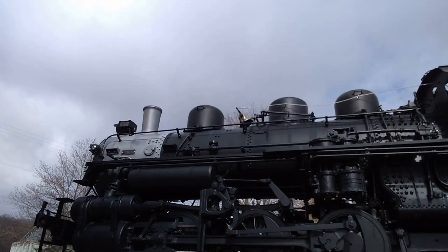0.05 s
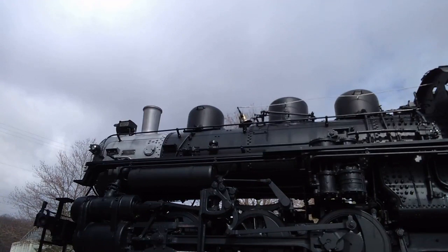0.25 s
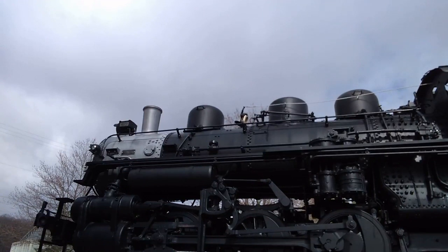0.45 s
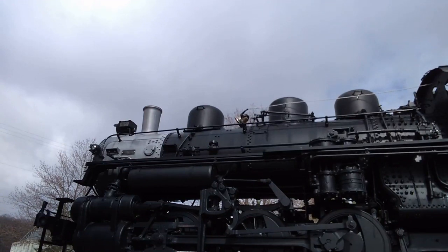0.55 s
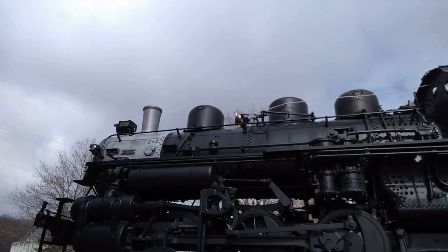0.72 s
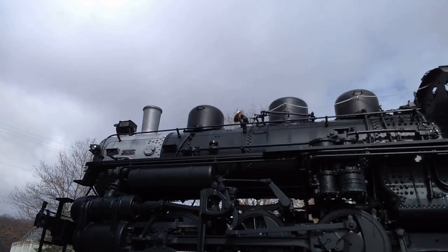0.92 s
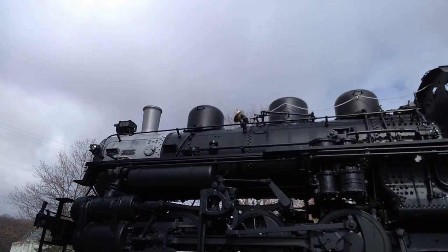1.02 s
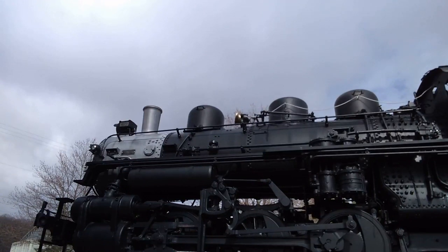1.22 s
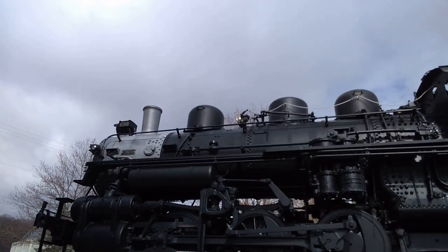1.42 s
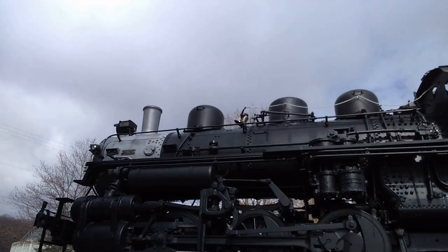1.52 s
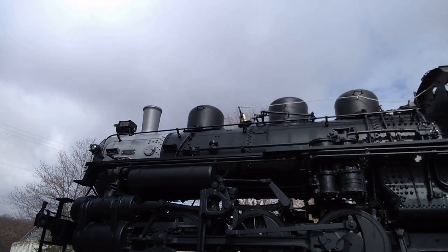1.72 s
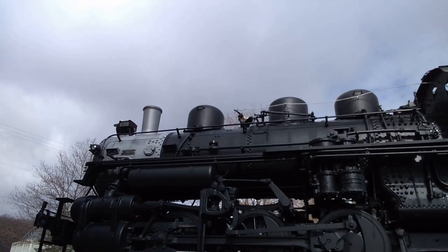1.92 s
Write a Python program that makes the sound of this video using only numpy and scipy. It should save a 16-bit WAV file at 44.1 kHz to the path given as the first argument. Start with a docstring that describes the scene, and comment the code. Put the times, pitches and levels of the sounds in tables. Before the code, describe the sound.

A locomotive bell rings outdoors. After soft wind and a dull knock at 0.13 s, the clapper strikes hard at 0.23 and again at 0.63 s, bright and clangorous. From 0.73 to 1.0 s it bounces on the rim, then rattles finely until about 1.6 s. The dense ring wavers as the bell swings, sinking after 1.4 s; another dull knock comes at 1.93 s. Faint groan, low wind gusts and steady hiss lie beneath.

```python
"""Outdoors, on top of a steam locomotive's boiler: a bell swings and its clapper strikes twice.
Decaying sine partials swell and dip as the bell turns; noise bursts make the blows and bounces.
After the second blow the clapper chatters on the rim (shaped noise), then the ring sinks away.
The gear gives two dull knocks (decaying noise) and a faint groan (gliding sine).
Slow-gusting low noise is a light wind on the microphone, over a steady hiss."""
import sys
import numpy as np
from scipy import signal
from scipy.fft import rfft, irfft
from scipy.io import wavfile
from scipy.ndimage import uniform_filter1d

SR = 44100
rng = np.random.default_rng(int(sys.argv[2]) if len(sys.argv) > 2 else 0)


def unload_audio(sound):
    """Save the sound as a 16-bit wav file, at the path given as the first command line argument."""
    columns = np.transpose(np.atleast_2d(sound))
    # keep every value between -1 and 1, then stretch to whole-number steps
    steps = np.round(np.clip(columns, -1, 1) * 32767)
    wavfile.write(sys.argv[1], SR, steps.astype(np.int16))


N = 85995
T = np.arange(N) / SR

# clapper blows: t/s, contact crack level/dB, fine overtone level before colour/dB
STRIKES = [(0.2266, -19.5, -47.5), (0.6251, -14, -38)]
# clapper bounces on the rim: t/s, level/dB
BOUNCES = [(0.731, -23), (0.795, -25), (0.824, -21), (0.905, -22.5), (0.954, -30), (1.02, -30)]
# fine rattle of the clapper on the rim: t/s, level/dB
CHATTER = [(0.62, -70), (0.66, -43), (0.8, -38), (1.0, -43), (1.3, -35), (1.45, -39.5), (1.6, -51.5),
           (1.75, -65), (1.95, -86)]


def from_db(db):
    """Decibels to gain."""
    return 10 ** (np.asarray(db) / 20)


def rms_one(x):
    """Scale to unit rms."""
    return x / np.sqrt(np.mean(x ** 2) + 1e-20)


def in_time(rows):
    """Control curve at every sample."""
    return np.interp(T, *np.transpose(rows))


def at_hz(points, hz):
    """Read a spectrum on a log-frequency axis."""
    f_hz, db = np.transpose(points)
    return np.interp(np.log(np.maximum(hz, 1)), np.log(f_hz), db)


def drift(corner_hz):
    """Unit-rms random curve: white noise through two equal poles, run at SR / step."""
    step, settle = 40, 1000
    r = np.exp(-2 * np.pi * corner_hz * step / SR)
    white = rng.standard_normal(N // step + settle + 2)
    slow = signal.lfilter([1], [1, -2 * r, r * r], white)[settle:]
    return np.interp(np.arange(N) / step, np.arange(len(slow)), rms_one(slow))


def coloured(x, colour):
    """Give a steady signal a spectrum; unit rms."""
    gain = from_db(at_hz(colour, np.arange(N // 2 + 1) * SR / N))
    return rms_one(irfft(rfft(x) * gain, N))


def noise(colour, likeness):
    """Coloured stereo noise; likeness is the left-right correlation."""
    mid, side = rng.standard_normal((2, N))
    c = np.clip(likeness, -1, 1)
    stereo = np.sqrt(1 + c) * mid + np.sqrt(1 - c) * np.array([side, -side])
    return coloured(stereo, colour)


def decay(start_s, t60_s):
    """Linear rise in 1/1500 s times exponential decay."""
    age_s = np.maximum(T - start_s, 0)
    return np.minimum(age_s * 1500, 1) * np.exp(-np.log(1000) * age_s / t60_s)


def swing_clock():
    """Doppler of the swinging bell: time runs slightly fast and slow, once per swing."""
    swing_s, doppler_share, highest_pitch_s = 1.724, 0.00078, 0.286
    angle = 2 * np.pi * (T - highest_pitch_s) / swing_s
    return T + doppler_share * swing_s / (2 * np.pi) * np.sin(angle)


def rattle_share():
    """Chatter gain relative to its peak; it shakes the ringing partials."""
    rattle = from_db(in_time(CHATTER))
    return rattle / rattle.max()


def partial(hz, blows, t60_s, pan_db, lead_rad, clock):
    """One mode in stereo; every blow (s, dB) adds its energy to the exponentially decaying ring."""
    kicks = np.zeros(N)
    for s, db in blows:
        kicks[int(s * SR)] += from_db(db) ** 2
    energy = signal.lfilter([1], [1, -from_db(-60 / (t60_s * SR)) ** 2], kicks)
    # causal mean: the ring builds up within a millisecond
    height = np.maximum(uniform_filter1d(np.sqrt(energy), size=32, origin=15), 0)
    phase = 2 * np.pi * (hz * clock + rng.random()) + np.array([[lead_rad / 2], [-lead_rad / 2]])
    pan = rms_one(from_db([[pan_db / 2], [-pan_db / 2]]))
    return height * pan * np.sin(phase)


def nodes(name):
    """Gain of a main partial: it dips as a node turns to the listener, swells on a lobe."""
    # node and lobe passages: partial, t/s, depth/dB (negative = swell), half width/s
    passages = [ ("hum", 0.429, 37, 0.064), ("hum", 0.684, 10.3, 0.084), ("hum", 1.205, 12, 0.2),
                ("hum", 1.45, 8.7, 0.016), ("prime", 0.28, 6.6, 0.11), ("prime", 1.47, 9.8, 0.025),
                ("tierce", 0.32, 24, 0.33), ("tierce", 0.567, -10, 0.066), ("tierce", 0.743, 10.7, 0.15),
                ("tierce", 1.445, 17, 0.09), ("tierce", 1.76, 5, 0.044), ("quint", 0.39, -8.5, 0.05),
                ("quint", 0.542, 17, 0.12), ("quint", 0.6, 12, 0.018), ("quint", 0.85, 16, 0.031),
                ("quint", 1.175, 13, 0.18), ("quint", 1.45, -12.5, 0.023), ("quint", 1.495, 37, 0.053),
                ("quint", 1.7, 21, 0.19), ("nominal", 0.496, 51, 0.053), ("nominal", .775, 20, 0.021),
                ("nominal", .855, 14, 0.028), ("nominal", 1.377, 16, 0.085), ("tenth", 0.594, 27, 0.065),
                ("tenth", 1.55, -13, 0.022), ("tenth", 1.13, 13, 0.23), ("tenth", 1.89, 14, 0.18),
                ("eleventh", 1.56, -18.5, 0.03), ("twelfth", 0.415, 7.8, 0.015),
                ("twelfth", 0.587, 11, 0.03), ("twelfth", 0.97, 32, 0.16), ("twelfth", 1.3, 22, 0.075),
                ("twelfth", 1.4, -5.5, 0.03), ("twelfth", 1.594, 12, 0.08), ("twelfth", 1.89, 18, 0.15),
                ("bright ping", 0.577, 11, 0.074), ("bright ping", 1.38, -3, 0.044),
                ("bright ping", 0.96, 16, 0.041), ("bright ping", 1.25, 7.3, 0.073)]
    gain = np.ones(N)
    for owner, s, depth_db, width_s in passages:
        if owner == name:
            away = ((T - s) / width_s) ** 2
            gain *= np.sqrt((from_db(-depth_db) ** 2 + away) / (1 + away))
    return gain


def main_partials(clock):
    """Main bell modes, unsteady in phase and level, more so under the chatter."""
    # modes: name, f/Hz, first blow/dB, second blow/dB, t60/s, share of the fade, L-R/dB, left lead/rad
    main_modes = [ ("hum", 510.3, -16, -17.5, 9.6, 1.52, -0.8, -0.14),
                  ("prime", 893.7, -13, -24, 7.4, 0.73, -0.39, -0.15),
                  ("tierce", 1076.1, -16, -34, 18.2, 0.28, -6, 0.33),
                  ("quint", 1469, -20, -17, 5.23, 1.36, 0.58, 1.37),
                  ("nominal", 1773.4, -15, -40, 4.43, 1.56, 3.6, 2.27),
                  ("tenth", 2312, -24.5, -33, 4.03, 0.32, -1.2, 1.0),
                  ("eleventh", 2377, -29, -24.5, 1.6, 0.17, 0, 1.0),
                  ("upper eleventh", 2553, -32, -22.5, 1.25, 0.72, 0, 0.86),
                  ("twelfth", 2667, -22.5, -14, 3.02, 1, -0.5, 1),
                  ("thirteenth", 2917, -35.5, -30, 4.7, 1.1, -1.8, 2.22),
                  ("bright ping", 4878, -21.5, -22.5, 2.93, 0.9, 6.8, 1)]
    # the ring sinks late in the swing: t/s, level/dB at share 1
    fade_curve = [(0.23, -1), (0.6, 0), (0.9, 1.5), (1.25, 2.5), (1.4, -1.5), (1.55, -7), (1.72, -15),
                  (1.95, -14)]
    waver_at_2500_hz, chatter_waver_at_2500_hz, waver_hz = 0.17, 0.3, 13.2   # rad and level share
    unrest = waver_at_2500_hz + chatter_waver_at_2500_hz * rattle_share()
    times_s = [blow[0] for blow in STRIKES]
    fade_db = in_time(fade_curve)
    ring = np.zeros((2, N))
    for name, hz, first_db, second_db, t60_s, share, pan_db, lead_rad in main_modes:
        waver = unrest * np.sqrt(hz / 2500)
        shaken = clock + waver * drift(waver_hz) / (2 * np.pi * hz)
        gain = from_db(share * fade_db) * nodes(name) * (1 + waver * drift(waver_hz))
        blows = zip(times_s, (first_db, second_db))
        ring += gain * partial(hz, blows, t60_s, pan_db, lead_rad, shaken)
    return ring


def overtones():
    """Upper modes struck by the two blows, as (Hz, blows, t60 at 4 kHz)."""
    # upper modes: f/Hz, first blow/dB, second blow/dB (before the offset)
    upper_modes = [(2527, -37, -37), (3313, -43, -33), (3513, -51, -53), (3710, -25, -30), (3749, -26, -44),
                   (3858, -33, -30), (3924, -38, -40), (4059, -33, -45), (4234, -30, -40), (4475, -46, -38),
                   (4511, -46, -40), (4577, -39, -31), (4916, -33, -37), (5016, -41, -45), (5163, -44, -36),
                   (5557, -55, -37), (5849, -50, -43), (5946, -40, -47), (6040, -51, -44), (6156, -36, -32),
                   (6183, -37, -40), (6426, -35, -39), (6613, -31, -39), (6806, -51, -42), (7230, -46, -48),
                   (7526, -32, -34), (7636, -35, -40), (7866, -51, -35), (7920, -60, -38), (8495, -41, -33),
                   (8570, -58, -40), (8962, -35, -33), (9164, -51, -41), (9430, -38, -55),
                   (10488, -46, -45), (10664, -45, -48)]
    offset_db, t60_at_4k_s = 1, 3.06
    times_s = [blow[0] for blow in STRIKES]
    return [(hz, zip(times_s, offset_db + np.array(blows_db)), t60_at_4k_s)
            for hz, *blows_db in upper_modes]


def fine_overtones():
    """Weak, crowded top modes, one at random in each of 56 bands; blows and bounces ring them."""
    # top overtone spectrum: f/Hz, level/dB
    fine_colour = [(9300, -9), (11200, -12), (12200, -8), (14200, -10)]
    bounce_ring_db, spread_db, t60_at_4k_s = -35, 2, 1.4   # ring re bounce level
    contacts = [(s, db) for s, _, db in STRIKES]
    contacts += [(s, db + bounce_ring_db) for s, db in BOUNCES]
    edges_hz = np.geomspace(fine_colour[0][0], fine_colour[-1][0], 57)
    modes = []
    for hz in rng.uniform(edges_hz[:-1], edges_hz[1:]):
        colour_db = at_hz(fine_colour, hz)
        blows = [(s, db + colour_db + rng.normal(0, spread_db)) for s, db in contacts]
        modes.append((hz, blows, t60_at_4k_s))
    return modes


def lobes(dip_s, spacing_s, depth_db):
    """Gain of an upper partial as its many lobes sweep past the listener."""
    leak = from_db(-abs(depth_db)) ** 2
    return np.sqrt(leak + (1 - leak) * np.sin(np.pi * (T - dip_s) / spacing_s) ** 2)


def upper_partials(clock):
    """Upper and fine modes: passing lobes, shimmer in level, waver in phase; higher ones die sooner."""
    # left-right balance: f/Hz, L-R/dB
    pan_curve = [(3300, -1), (3900, 8.5), (4600, 12), (4950, 7), (7000, 4.5), (9000, -3.5)]
    # level of the upper partials through the swing: t/s, level/dB
    treble = [(0.23, 1.5), (0.42, 1), (0.58, -11), (0.63, 0), (0.85, 2), (1.05, 4), (1.22, -1), (1.31, 5.5),
              (1.5, -2.5), (1.65, -12), (1.95, -18)]
    t60_slope, lobe_depth_db = 0.35, 8
    waver_rad, chatter_waver_rad, waver_hz = 0.26, 0.56, 23.7
    ear_waver_share = 0.6   # opposite-sign waver between the ears, re the common part
    shimmer, shimmer_hz = 0.25, 14
    chatter_shimmer, chatter_shimmer_hz = 0.35, 38
    rattle = rattle_share()
    unrest_rad = waver_rad + chatter_waver_rad * rattle
    ears = np.array([[1], [-1]])
    ring = np.zeros((2, N))
    for hz, blows, t60_at_4k_s in overtones() + fine_overtones():
        spacing_s = rng.uniform(0.577, 1.575) / 2.985
        # each ear meets the first dip at its own time
        dips_s = STRIKES[0][0] + spacing_s * rng.uniform(0.28, 0.73, (2, 1))
        flicker = 1 + shimmer * drift(shimmer_hz)
        flicker += chatter_shimmer * rattle * drift(chatter_shimmer_hz)
        gain = lobes(dips_s, spacing_s, lobe_depth_db) * flicker
        wander = drift(waver_hz) + ear_waver_share * drift(waver_hz) * ears
        shaken = clock + unrest_rad * wander / (2 * np.pi * hz)
        t60_s = t60_at_4k_s * (4000 / hz) ** t60_slope
        lead_rad = rng.normal(0, 1.0)
        ring += gain * partial(hz, blows, t60_s, at_hz(pan_curve, hz), lead_rad, shaken)
    return ring * from_db(in_time(treble))


def bell():
    """All modes of the bell, carried by the swing and shaken by the chatter."""
    clock = swing_clock()
    return main_partials(clock) + upper_partials(clock)


def clapper():
    """Noise contacts: blows crack and scatter off the boiler; duller bounces and a fine rattle follow."""
    # spectra of blow, bounce and rattle: f/Hz, level/dB
    crack_colour = [(300, -22), (560, 9), (1000, 3.5), (2600, -1), (5000, -5), (8500, 1), (11000, -12),
                    (15000, -25)]
    bounce_colour = [(250, -16.5), (560, -1), (1000, -3), (1600, -5), (2600, -24), (6000, -14), (9000, -19),
                     (15000, -58)]
    chatter_colour = [(200, -18.5), (500, 8), (1000, 0.5), (1500, 0), (2050, -14), (2500, 9), (3200, -23),
                      (3900, -3), (5400, -19), (8000, -18), (11000, -42)]
    crack_t60_s, scatter_t60_s, scatter_db, bounce_t60_s = 0.061, 0.35, -17, 0.071
    cracks, bounces = np.zeros(N), np.zeros(N)
    for s, db, _ in STRIKES:
        scatter = from_db(scatter_db) * decay(s, scatter_t60_s)
        cracks += from_db(db) * (decay(s, crack_t60_s) + scatter)
    for s, db in BOUNCES:
        bounces += from_db(db) * decay(s, bounce_t60_s)
    rattle = from_db(in_time(CHATTER))
    layers = [(cracks, crack_colour), (bounces, bounce_colour), (rattle, chatter_colour)]
    return sum(level * noise(colour, 1) for level, colour in layers)   # same in both ears


def gear_knocks():
    """Dull knocks of the bell's mounting: decaying low noise."""
    # knocks: t/s, level/dB
    knock_rows = [(0.132, -32), (1.933, -34)]
    # knock spectrum: f/Hz, level/dB
    knock_colour = [(60, -26), (150, -3), (350, 3), (650, -6), (1050, 1.5), (1400, -29), (3000, -47),
                    (8000, -65)]
    level = sum(from_db(db) * decay(s, 0.55) for s, db in knock_rows)
    return level * noise(knock_colour, 0.85)


def gear_groan():
    """Faint low groan: a sine gliding with the swing, roughened in phase and level."""
    # groan path: t/s, f/Hz, level/dB
    groan_path = [(0.4, 270.4, -65), (0.5, 278.5, -42), (0.57, 291, -41.5), (0.66, 321, -69)]
    rough = 0.54   # rad and level share
    s, hz, db = np.transpose(groan_path)
    phase = 2 * np.pi * np.cumsum(np.interp(T, s, hz)) / SR + rough * drift(29)
    level = from_db(np.interp(T, s, db)) * (T > s[0]) * (T < s[-1])
    return level * np.sin(phase) * (1 + rough * drift(35))


def wind():
    """Wind on the microphone: low noise following the gusts."""
    # gusts: t/s, level/dB
    gusts = [(0.0, -40.5), (0.038, -36), (0.076, -48), (0.146, -41), (0.428, -61), (0.548, -54),
             (1.02, -53), (1.21, -38.5), (1.482, -52), (1.726, -37), (1.894, -47.5), (1.95, -31)]
    # wind spectrum: f/Hz, level/dB
    wind_colour = [(25, -37), (50, -3.5), (90, -0.5), (160, -4), (260, -18.5), (500, -44), (1500, -44)]
    return from_db(in_time(gusts)) * noise(wind_colour, 0.42)


def air_hiss():
    """Faint steady broadband noise."""
    # hiss spectrum: f/Hz, level/dB
    air_colour = [(40, -8.5), (150, 3), (350, -3.5), (700, -14), (2000, -20.5), (5000, -22), (9500, -16),
                  (12000, -27.5), (15500, -30)]
    return from_db(-49) * noise(air_colour, 0.6)


def scene():
    """Everything together."""
    return bell() + clapper() + gear_knocks() + gear_groan() + wind() + air_hiss()


def record(dry):
    """Steep low-pass cuts the top; the last 4 ms ease out."""
    stop_hz, stop_db = 16200, 70
    ease = np.minimum((T[-1] - T) / 0.004, 1)
    low_pass = signal.cheby2(16, stop_db, stop_hz, fs=SR, output="sos")
    return ease * signal.sosfilt(low_pass, dry)


dry = scene()
out = record(dry)
unload_audio(out)
```